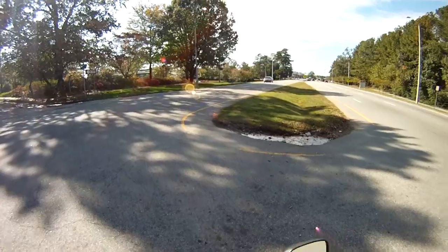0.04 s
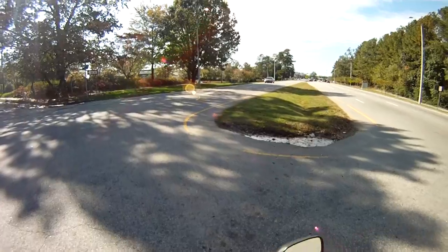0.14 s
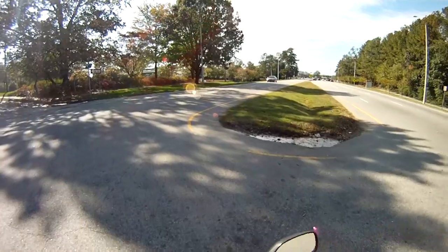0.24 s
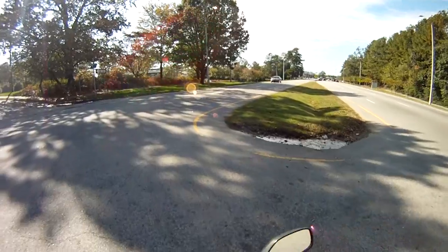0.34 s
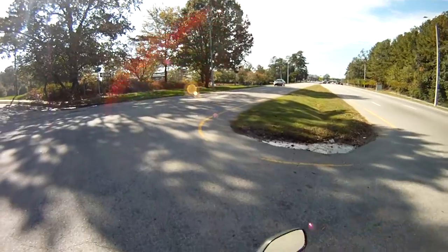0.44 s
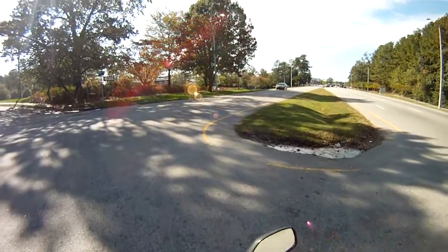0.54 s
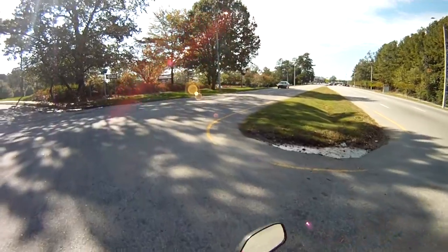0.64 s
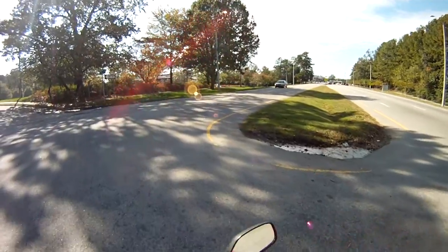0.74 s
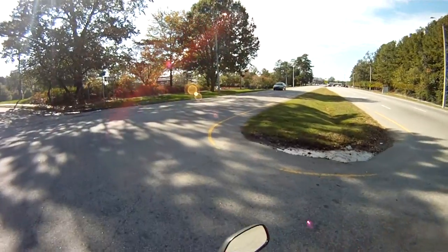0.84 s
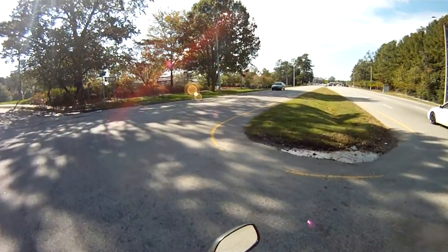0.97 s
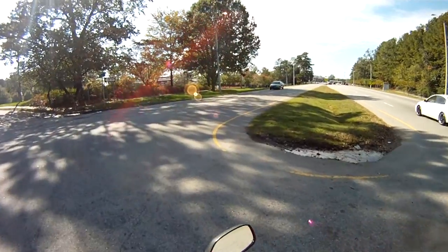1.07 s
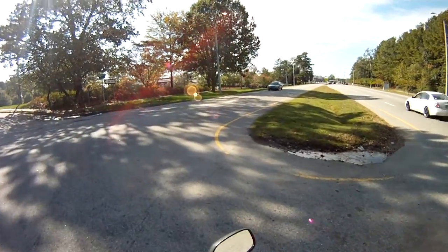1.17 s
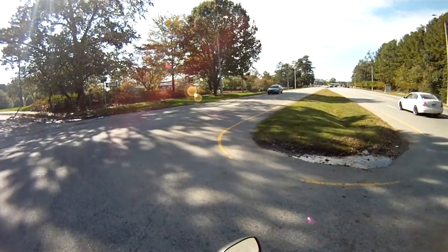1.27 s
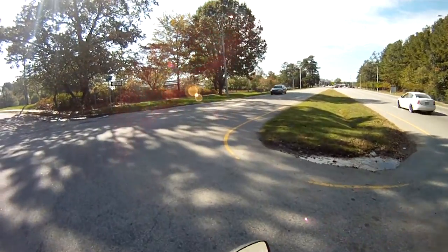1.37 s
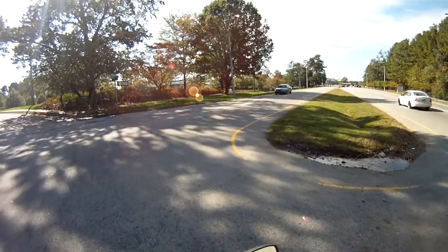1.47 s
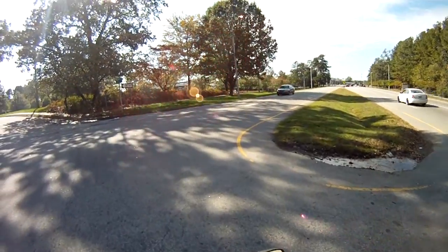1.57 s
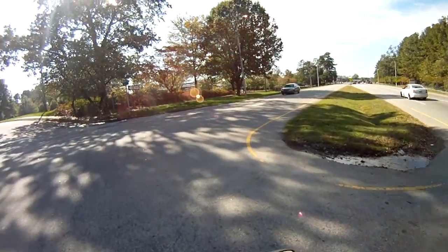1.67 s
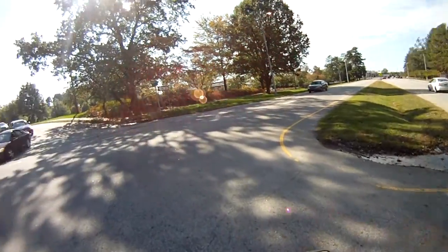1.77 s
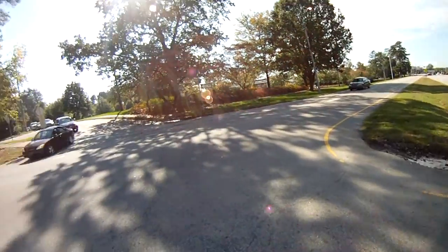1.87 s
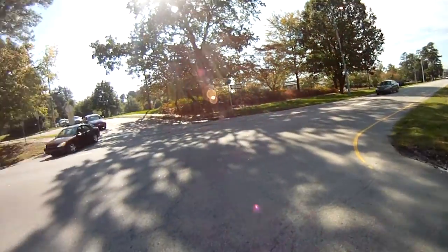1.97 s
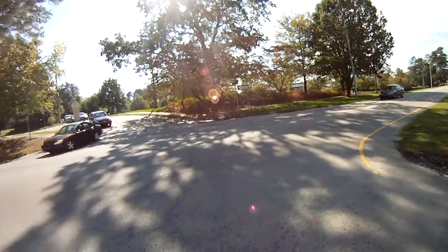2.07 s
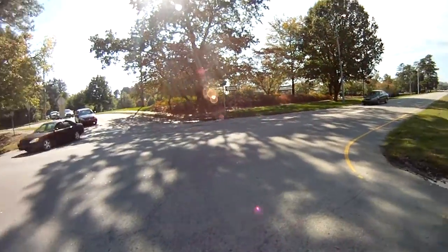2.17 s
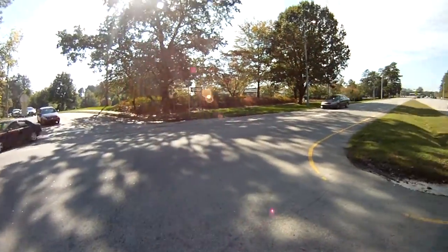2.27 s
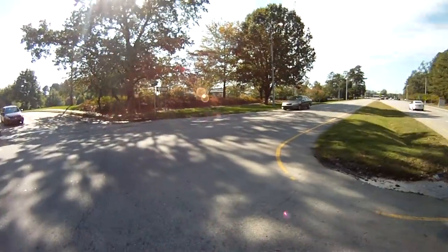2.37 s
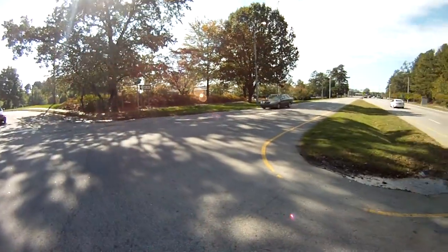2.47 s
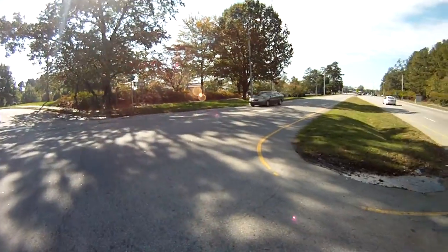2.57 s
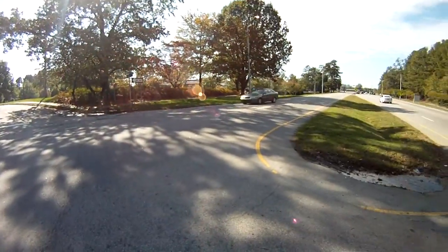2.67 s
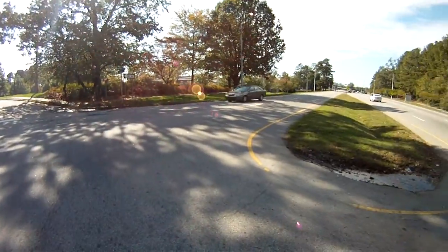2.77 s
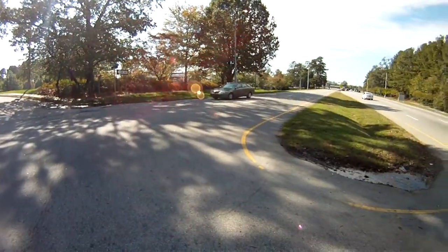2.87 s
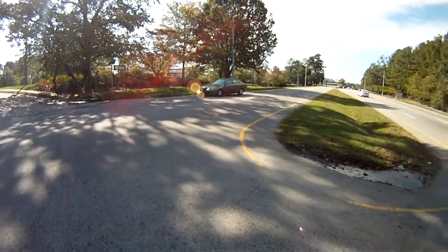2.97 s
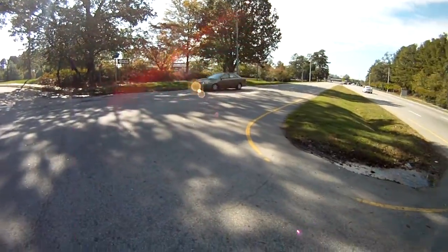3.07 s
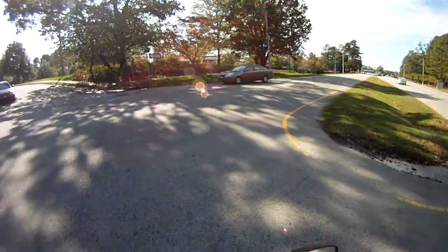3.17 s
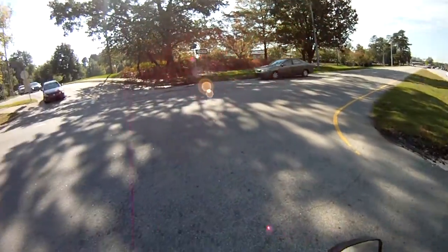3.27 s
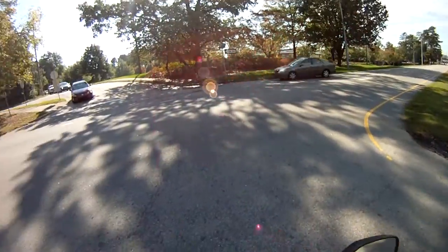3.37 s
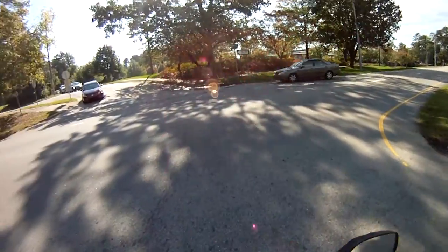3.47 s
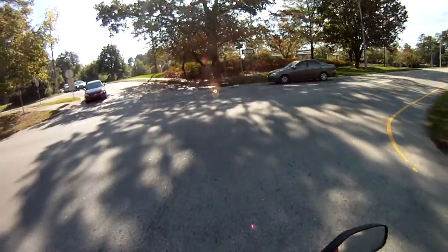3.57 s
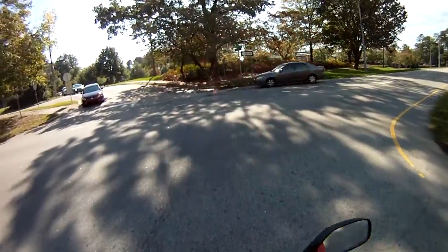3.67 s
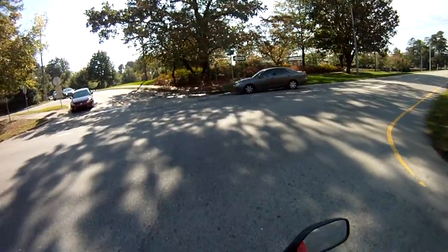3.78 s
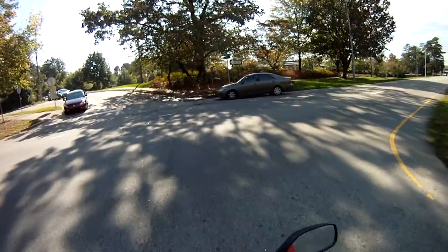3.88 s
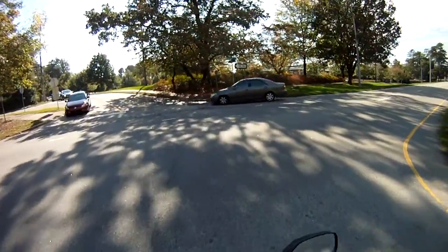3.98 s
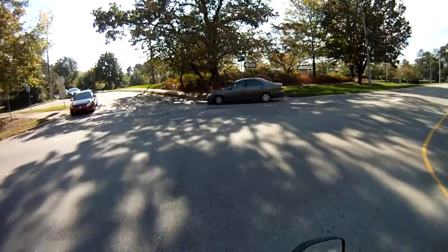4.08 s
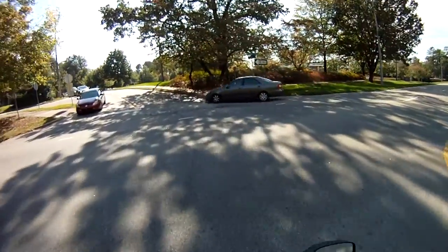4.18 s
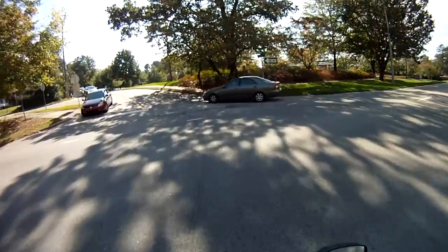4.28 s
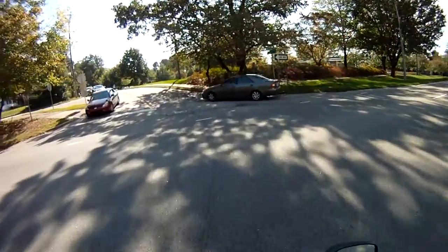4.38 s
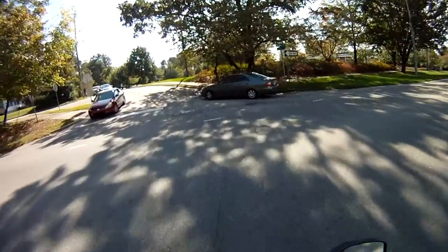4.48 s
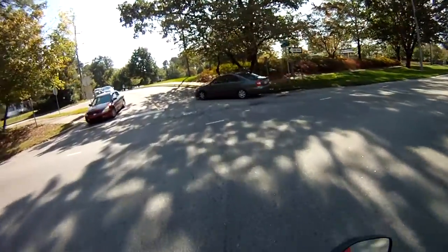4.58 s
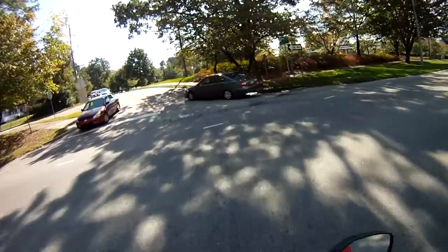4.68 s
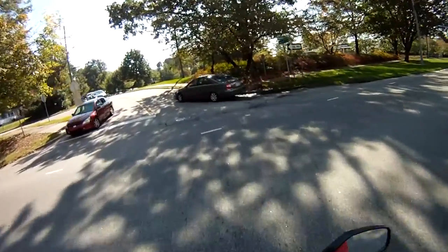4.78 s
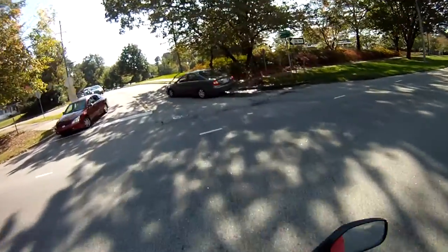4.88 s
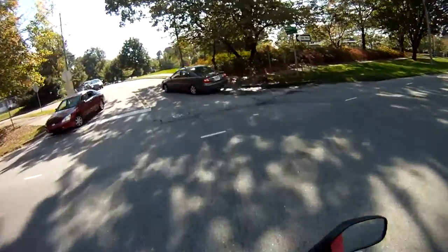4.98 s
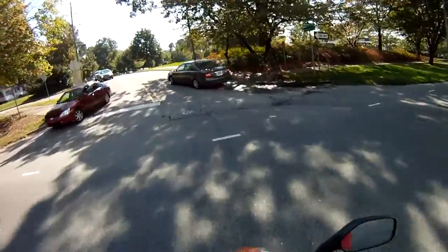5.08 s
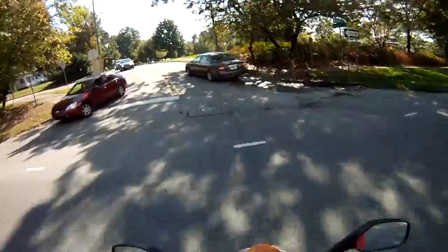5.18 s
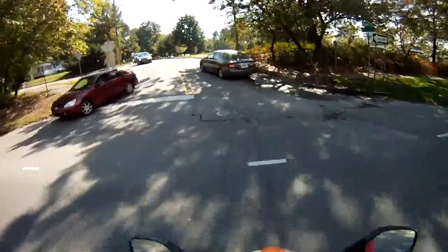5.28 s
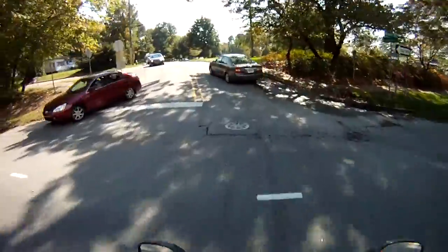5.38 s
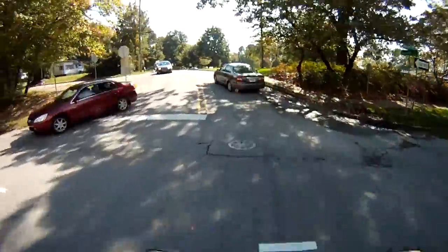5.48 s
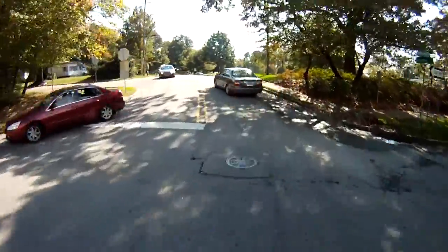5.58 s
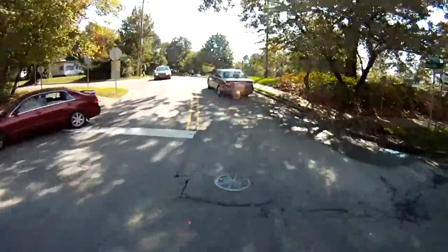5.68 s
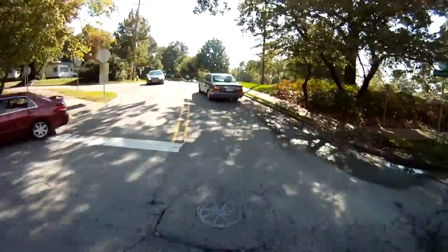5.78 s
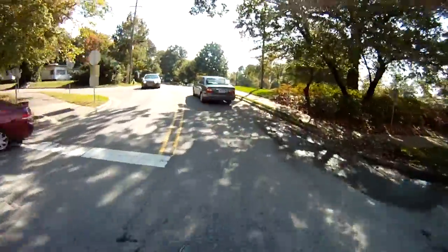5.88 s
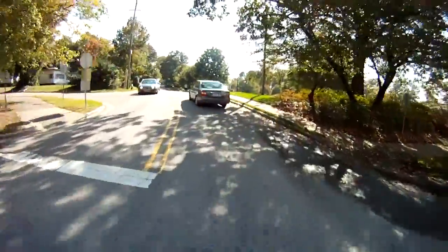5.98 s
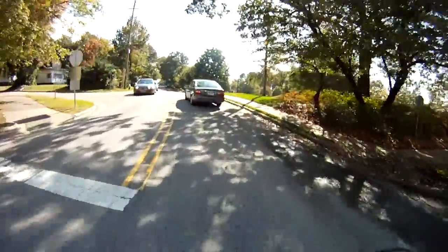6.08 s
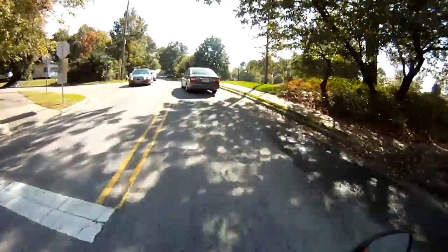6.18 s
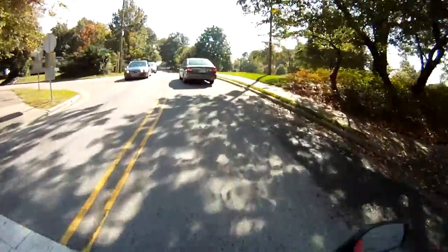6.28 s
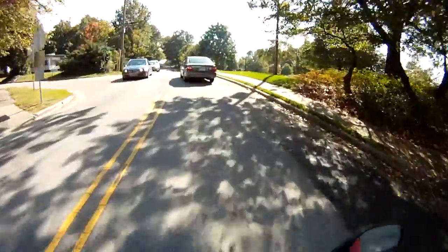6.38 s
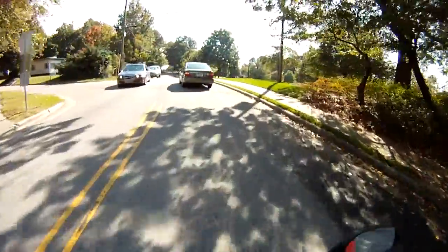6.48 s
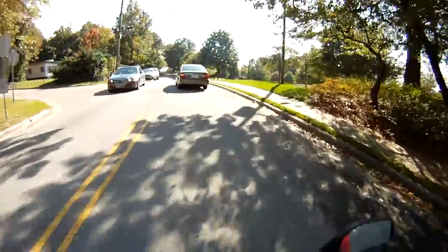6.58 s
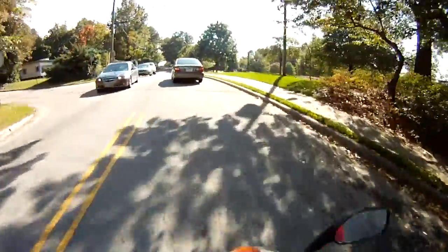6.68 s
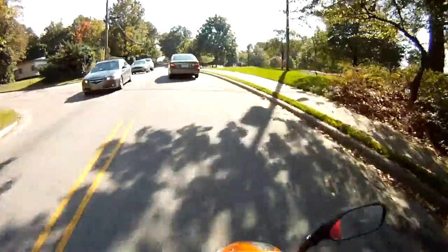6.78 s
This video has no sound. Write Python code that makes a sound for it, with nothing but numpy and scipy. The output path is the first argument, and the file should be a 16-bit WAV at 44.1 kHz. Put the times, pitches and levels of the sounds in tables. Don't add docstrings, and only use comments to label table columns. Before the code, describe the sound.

Outdoors on a road, close to a small two-stroke scooter, heard from the rider's helmet through a coarse, gritty mono microphone. At 0 s scattered sharp pops lead into a short raspy throttle blip, about 0.15 to 0.45 s. The throttle shuts and the engine coasts until about 2.7 s, pitch sinking, with irregular cracks, little puttering clusters, a few loose ticks, soft clatter and hum. From 2.7 s it catches and revs steeply, becoming a dense, nasal, hissing buzz by 3.1 s, highest of this first climb near 3.8 s. Around 4.0 to 4.6 s a low car drone sinks in pitch beneath it. The buzz eases slightly, then climbs again to 5.4 s, where it briefly drops in loudness while gusts roar. It surges back near 6 s and holds a loud, slightly wavering drone to the end at 6.8 s, with wind buffeting throughout.

```python
import sys
import numpy as np
from scipy import signal
from scipy.fft import rfft, irfft
from scipy.io import wavfile
from scipy.ndimage import uniform_filter1d

SR = 44100
rng = np.random.default_rng(int(sys.argv[2]) if len(sys.argv) > 2 else 0)


def level_to_linear(level):
    exponent = np.asarray(level, float) / 20
    return 10 ** exponent


def output_pcm(signal):
    pcm = np.clip(np.atleast_2d(signal).T, -1, 1) * 32767
    wavfile.write(sys.argv[1], SR, np.round(pcm).astype(np.int16))


N = 301626
T = np.arange(N) / SR
IDLE_HZ = 50.6

# time_s, effort_db, crack_over_thump_db, road_echo_share (0-1)
PULLS = [
    [(0.153, -16, -4.5, 0.3), (0.2, -19, -4.5, 1), (0.3, -16.5, -6, 0.7), (0.445, -15.5, -7.5, 0.96)],
    [(2.722, -27.5, -9, 0.5), (2.83, -23.5, -8.5, 0.7), (2.95, -15.5, -10, 0.54), (3.12, -16.5, -5.5, 1),
     (3.39, -16.5, -9, 0.99), (3.62, -14.5, -8.5, 0.6), (3.9, -15.5, -4, 0.59), (4.4, -15.5, -9.5, 0.95),
     (4.78, -14, -6, 0.76), (5.1, -15, -8.5, 0.92), (5.3, -18, -9, 1), (5.4, -22, -10, 0.4),
     (5.47, -26.5, -9, 1), (5.56, -22.5, -9.5, 0.57), (5.71, -19, -3.5, 0.43), (5.76, -23, -4.5, 0.7),
     (5.96, -15, -6, 0.47), (6.84, -16, -6, 0.38)],
]
# start_s, first_peak_db, change_per_firing_db, length_s
RUNS = [(0.0396, -9, 0, .005), (0.0522, -9, 0, .005), (0.11, -7.5, 0, .005), (0.123, -10.5, -5, .005),
        (0.5005, -9.5, 0, .005), (0.5898, -12, 0, .005), (0.667, -31, 0, .005), (0.6794, -10, 0, .005),
        (0.7724, -11.5, 0, .005), (0.8405, -11.5, 0, .005), (0.911, -13.5, 0, .005),
        (0.9675, -16.5, -14, .045), (1.028, -15.5, 0, .005), (1.1044, -17, -2.5, .08),
        (1.2484, -15.5, 0, .005), (1.3315, -24, 8.5, .05), (1.4348, -23, 0, .005),
        (1.4695, -14, -9.5, .085), (1.574, -13, -8, .085), (1.702, -15, -5, .055), (1.7935, -13, -7, .055),
        (1.887, -21.5, 0, .005), (1.941, -13.5, -0.8, .21), (2.1908, -15, -0.5, .135),
        (2.4003, -18, 2.5, .055), (2.535, -18.5, -2.5, .055), (2.616, -20.5, 0, .005),
        (2.674, -17, -1, .045)]


def evened(x):
    return x / np.sqrt(np.mean(x ** 2) + 1e-20)


def curves(rows):
    s, *columns = np.transpose(rows)
    return [np.interp(T, s, c) for c in columns]


def spectrum_gain(points, hz):
    f, db = np.transpose(points)
    return level_to_linear(np.interp(np.log(hz + 1), np.log(f), db))


def band_noise(lo_hz, hi_hz, order=2):
    band = signal.butter(order, [lo_hz, hi_hz], "band", fs=SR, output="sos")
    return evened(signal.sosfilt(band, rng.standard_normal(N)))


def clicks(at, height):
    k = np.clip(at.astype(int), 0, N - 2)
    part = at % 1
    return np.bincount(k, height * (1 - part), N) + np.bincount(k + 1, height * part, N)


def ring(modes, size=1200, rise_s=0.00002):
    t = np.arange(size) / SR
    h = np.zeros(size)
    for hz, width_hz, db, sign in modes:
        h -= sign * level_to_linear(db) * np.exp(-np.pi * width_hz * t) * np.cos(2 * np.pi * hz * t)
    h = h * (1 - np.exp(-(t / rise_s) ** 2))
    h = signal.sosfilt(signal.butter(2, 260, "high", fs=SR, output="sos"), h)
    return h / np.linalg.norm(h)


def crank():
    # time_s, speed_hz (turns per second)
    blip_speed = [(0.0, 88.3), (0.12, 84.5), (0.29, 94.2), (0.38, 96.9), (0.45, 97.8)]
    # time_s, speed_hz (turns per second)
    pull_speed = [(2.66, 50.8), (2.8, 57.4), (3.05, 95.2), (3.13, 103.6), (3.21, 108.4), (3.39, 114.4),
                  (3.58, 119.1), (3.77, 122), (4.06, 117), (4.27, 114.1), (4.55, 113.9), (4.71, 118.5),
                  (5.11, 134.6), (5.41, 138.1), (5.68, 134.6), (5.96, 132.7), (6.33, 133.1), (6.67, 136.2)]
    (blip,), (pull,) = curves(blip_speed), curves(pull_speed)
    shut_s, top_hz = blip_speed[-1]
    coast = IDLE_HZ + (top_hz - IDLE_HZ) * np.exp(-(T - shut_s) / 0.49)
    hz = np.where(T < shut_s, blip, np.where(T < pull_speed[0][0], coast, pull))
    hz = uniform_filter1d(hz, size=2200, mode="nearest")
    hz = hz + 0.35 * np.clip(T - 5, 0, 1) * band_noise(2.1, 7.3)
    turns = np.cumsum(hz) / SR
    start_s = np.transpose(RUNS)[0]
    slip = np.unwrap(np.interp(start_s, T, turns) % 1, period=1)
    turns = turns - np.interp(T, start_s, slip)
    whole = np.arange(np.ceil(turns[0]), turns[-1])
    return hz, turns, np.interp(whole, turns, T)


def throttle(column):
    rows = np.concatenate(PULLS)
    load = sum((T >= pull[0][0]) & (T <= pull[-1][0]) for pull in PULLS) * 1.0
    return np.interp(T, rows[:, 0], rows[:, column]), load


def coasting(when):
    peak_db = -37 + 4 * rng.standard_normal(len(when))
    for start, first_db, step_db, length in RUNS:
        k = np.arange(np.argmin(abs(when - start)), len(when), 2)
        k = k[when[k] - when[k[0]] <= length]
        peak_db[k] = first_db + step_db * np.arange(len(k))
    shut = np.interp(when, T, throttle(column=1)[1]) < 0.5
    return when[shut], peak_db[shut]


def exhaust(hz, when):
    # mode_hz, width_hz, level_db, sign
    thump_modes = [(226, 250, 4.5, 0.49), (584, 350, -5.5, 0.88), (920, 290, -5.5, -0.89),
                   (1302, 47, -26, -0.4)]
    # mode_hz, width_hz, level_db, sign
    crack_modes = [(1700, 300, -16, -1), (1950, 400, -12, 1), (2350, 760, -1.5, 1), (2520, 620, -2.8, -1),
                   (3450, 550, -8, -1), (3950, 450, -12, 1), (4700, 700, -17, -1)]
    # mode_hz, width_hz, level_db, sign
    gulp_modes = [(371.8, 30, 8, 0.93), (656, 17, -8, 0.56), (1110, 180, -1, 1), (1206, 37, 5.5, 0.51),
                  (1850, 180, 4, 0.95)]
    # delay_s, level_db, sign
    echo_paths = [(.00421, -26.5, 1.5), (.00474, -10, -2), (.00619, -11.5, -0.1)]
    # time_s, stretch (ratio), echo_share (0-1)
    far_path = [(0.2, 1.04, 0.57), (0.45, 1.04, 0.54), (2.9, 0.97, 0.48), (3.2, 1.14, 0.87), (3.6, 0.97, 1),
                (4.4, 1.085, 0.64), (5.15, 1.055, 0.93), (5.5, 1.06, 0.66), (5.96, 0.99, 0.44),
                (6.8, 1.093, 0.9)]
    # time_s, peak_db
    ticks = [(0.5296, -14), (0.624, -12), (0.7102, -18)]

    s, peak_db = coasting(when)
    thump = clicks((s + 0.000531) * SR, level_to_linear(-14 + 0.63 * (peak_db + 14) + 7.5) * 4)
    s, peak_db = np.hstack([[s, peak_db], np.transpose(ticks)])
    crack = clicks((s + 0.000604) * SR, level_to_linear(peak_db + 1) * 4)

    gulp = np.zeros(N)
    chance = rng.standard_normal((len(when), 3))
    for rows in PULLS:
        s, thump_db, over_db, _ = np.transpose(rows)
        on = (when >= s[0]) & (when <= s[-1])
        t, (late, push_luck, snap_luck) = when[on], chance[on].T
        turn = SR / np.interp(t, T, hz)
        at = (t + 0.000012 * late) * SR
        uneven_db = 0.28 + 1.5 * np.clip((108 - SR / turn) / 20, 0, 1)
        push = np.sqrt(turn) * level_to_linear(np.interp(t, s, thump_db) + uneven_db * push_luck)
        thump = thump + clicks(at, push * level_to_linear(-2.0))
        gulp = gulp + clicks(at + 0.3477 * turn, push * level_to_linear(-9.0))
        snap = np.sqrt(turn) * level_to_linear(np.interp(t, s, thump_db + over_db) - 2.5 + 0.5 * snap_luck)
        crack = crack + clicks(at, snap)
        crack = crack + clicks(at + 0.34 * turn + 0.001944 * SR, -snap * level_to_linear(-8.0))

    bright = signal.oaconvolve(crack, ring(crack_modes))[:N]
    direct = signal.oaconvolve(thump, ring(thump_modes, rise_s=0.00006))[:N] + bright
    gulp = signal.oaconvolve(gulp, ring(gulp_modes, rise_s=0.00016))[:N]

    share, load = throttle(column=3)
    road_share = np.where(load > 0, share, 0.71)
    road = road_share * np.interp(T - 0.00174, T, direct)
    stretch, far = curves(far_path)
    echoes = np.zeros(N)
    for delay, db, sign in echo_paths:
        echoes += sign * level_to_linear(db) * np.interp(T - delay * stretch, T, direct)
    for k, delay in enumerate(rng.uniform(0.0008, 0.0085, size=12)):
        glint = (-1) ** k * level_to_linear(-500 * delay) * np.interp(T - delay * stretch, T, bright)
        echoes += level_to_linear(-10) * glint
    return direct + road + far * echoes + gulp


def motor(hz, turns):
    # frequency_hz, density_db (dB per Hz)
    clatter_spectrum = [(200, -32), (300, -1), (520, -8.5), (780, -8.5), (860, -24), (1180, -13.5),
                        (1450, -17.5), (2290, -14), (2750, -19), (2950, -16), (3600, -23), (4300, -23.5),
                        (6000, -31)]
    # frequency_hz, density_db (dB per Hz)
    hiss_spectrum = [(120, -6), (200, -12.5), (241, -3), (633, -4.5), (680, -7), (879, -27), (943, -16),
                     (1410, -21), (2350, -12.5), (3540, -10), (6000, -18.5), (7800, -67), (13200, -120)]
    # frequency_hz, level_db
    hum_spectrum = [(150, -25), (260, -11), (320, -7), (400, 4.5), (510, -3), (640, 2), (780, -22.5),
                    (860, -18), (1200, -61), (1400, -44)]

    effort_db, load = throttle(column=1)
    pumping = uniform_filter1d(load, size=6000)
    load = uniform_filter1d(load * np.clip((effort_db + 37) / 10, 0, 1), size=2500)
    over_hz, effort_db = hz - IDLE_HZ, effort_db + 15

    throb_db = (1 - pumping) * (-57 + 0.26 * over_hz) + pumping * (-17 + 0.2 * effort_db)
    clatter_db = -39 + 0.4054 * np.minimum(over_hz, 30)
    hiss_db = -26.5 + 1.05 * effort_db + 2 * np.maximum(T - 4.5, 0)
    noise_db = (1 - load) * clatter_db + load * hiss_db
    hum_db = -29 + 0.11 * over_hz + 3.5 * load - 1.6 * np.maximum(hz - 100, 0)

    first = np.cos(2 * np.pi * (turns - 0.05))
    second = load * level_to_linear(-9 + 0.5 * (hz - 130)) * np.cos(4 * np.pi * (turns - 0.036))
    throb = -np.sqrt(2) * (first + second)

    slow = np.linspace(0, N / SR, 110)
    hum = np.zeros(N)
    for k in range(3, 17):
        waver = level_to_linear(np.interp(T, slow, 1.95 * rng.standard_normal(len(slow))))
        hum += spectrum_gain(hum_spectrum, k * hz) * waver * np.sin(2 * np.pi * (k * turns + rng.random()))
    hum = hum / np.std(hum[:3 * SR])

    flare = 0.75 + np.exp(-(turns % 1) / 0.21)
    z, f = rfft(flare * rng.standard_normal(N)), np.fft.rfftfreq(N, 1 / SR)
    clatter = evened(irfft(z * spectrum_gain(clatter_spectrum, f), N))
    hiss = evened(irfft(z * spectrum_gain(hiss_spectrum, f), N))
    noise = (1 - load) * clatter + load * level_to_linear(-3.5) * hiss
    return level_to_linear(throb_db - 4.0) * throb + level_to_linear(hum_db) * hum + level_to_linear(noise_db + 6.0) * noise


def wind():
    # time_s, level_db
    air_flow = [(0, -25), (0.9, -28.5), (1.6, -31.5), (2.9, -27), (3.1, -56), (4.3, -45), (5.05, -48),
                (5.2, -24), (6.84, -26.5)]
    # time_s, half_length_s, buffeting_db, roar_db
    gusts = [(0.08, 0.045, -40, -33), (0.487, 0.055, -29, -51), (0.61, 0.031, -41, -40),
             (0.828, 0.043, -29, -24), (1.023, 0.027, -37, -30), (1.49, 0.11, -42, -28),
             (2.62, 0.043, -49, -28), (2.82, 0.042, -40, -24), (3.16, 0.044, -25, -36),
             (3.45, 0.075, -30, -51), (4.19, 0.35, -48, -26.5), (4.596, 0.06, -38, -32),
             (5.15, 0.022, -23, -38), (5.336, 0.058, -27, -12), (5.45, 0.034, -27, -12),
             (5.63, 0.18, -30, -18), (5.81, 0.033, -27, -23), (5.95, 0.02, -23, -19),
             (6.31, 0.034, -29, -40), (6.547, 0.12, -28, -24)]
    air = level_to_linear(curves(air_flow)[0] - 2.5 * band_noise(1.0, 3.2, order=1))
    bells = [np.exp(-((T - s) / half) ** 2) for s, half, *_ in gusts]
    buffet_db, roar_db = np.transpose(gusts)[2:]
    lumps = level_to_linear(2.5 * band_noise(4, 25, order=1))
    buffet = (air + level_to_linear(buffet_db) @ bells) * band_noise(33.0, 115.0, order=3)
    roar_level = (air * level_to_linear(5) + level_to_linear(roar_db) @ bells) * level_to_linear(-7.0)
    return buffet + roar_level * evened(lumps * band_noise(81.0, 278.0))


def car():
    # time_s, pitch_hz, level_db
    drone = [
        (3.85, 75, -44),
        (3.95, 72, -33),
        (4.292, 49, -26),
        (4.394, 48.7, -22),
        (4.62, 49, -43),
    ]
    hz, db = curves(drone)
    inside = uniform_filter1d(((T > drone[0][0]) & (T < drone[-1][0])) * 1.0, size=3000)
    return inside * level_to_linear(db) * np.sqrt(2) * np.sin(2 * np.pi * np.cumsum(hz) / SR)


def scene():
    hz, turns, when = crank()
    return (exhaust(hz, when) + motor(hz, turns) + car() + wind())[None]


def low_pass(x):
    return signal.sosfilt(signal.butter(12, 16460, fs=SR, output="sos"), x)


def record(dry):
    soft = signal.sosfilt(signal.butter(3, 5000, fs=SR, output="sos"), dry)
    soft = soft - 0.71 * signal.lfilter(*signal.iirpeak(4400.0, 5.0, SR), soft)
    slow = signal.resample_poly(soft, 40, 147, axis=1)
    held = np.repeat(slow, 4, axis=1)
    back = signal.resample_poly(held, 147, 160, axis=1)[:, :N]
    back = np.pad(back, ((0, 0), (0, N - back.shape[1])))
    edge = signal.firwin(511, 15350, window=("kaiser", 9), fs=SR)
    cut = signal.oaconvolve(back, edge[None], "same")
    return low_pass(np.clip(cut, -1, 1))


dry = scene()
out = record(dry)
output_pcm(out)
```